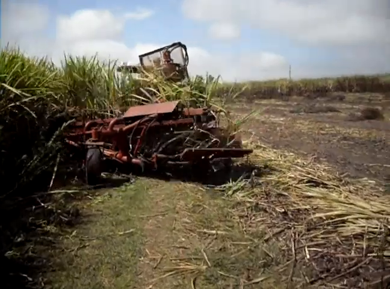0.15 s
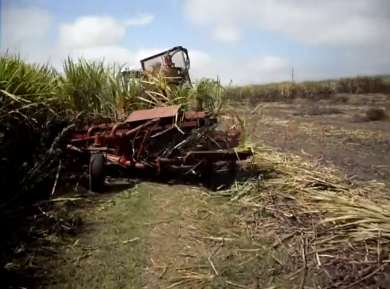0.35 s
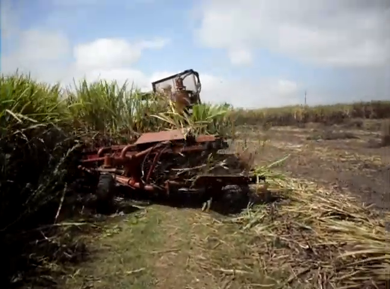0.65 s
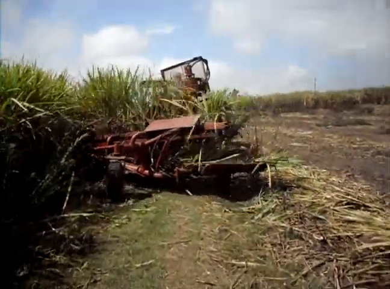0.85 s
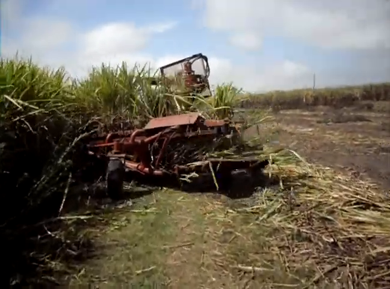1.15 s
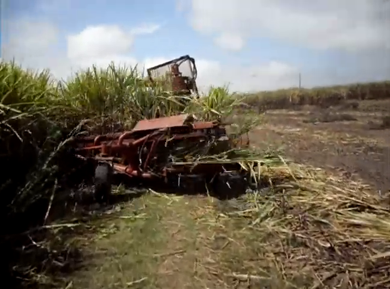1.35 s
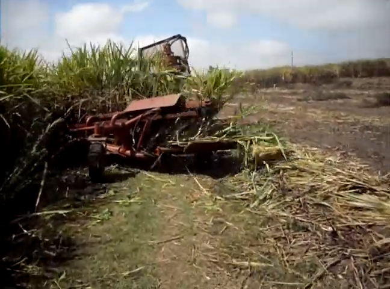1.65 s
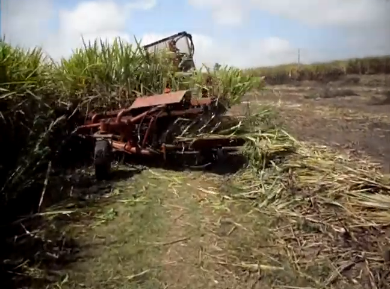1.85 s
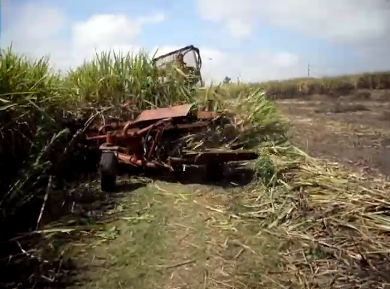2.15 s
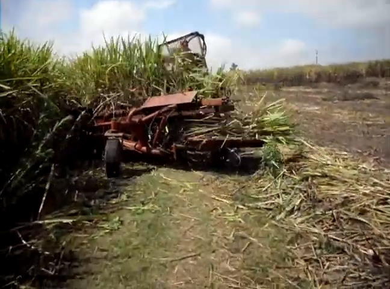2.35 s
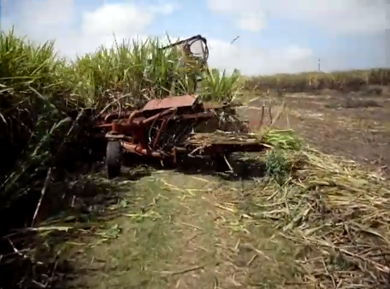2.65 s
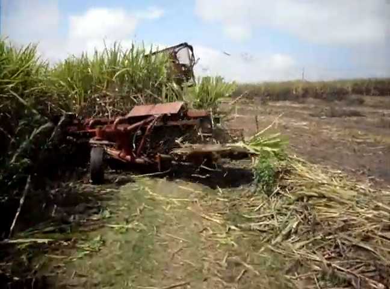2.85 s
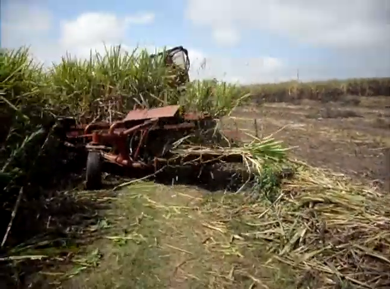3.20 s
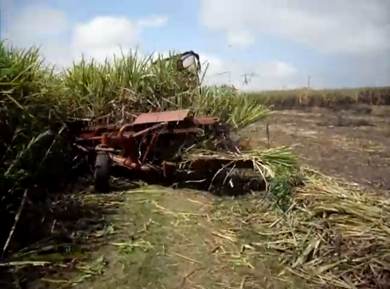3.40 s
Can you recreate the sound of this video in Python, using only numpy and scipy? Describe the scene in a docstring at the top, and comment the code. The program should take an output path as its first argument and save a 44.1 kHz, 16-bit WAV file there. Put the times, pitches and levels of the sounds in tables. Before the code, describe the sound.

A cane harvester's spinning cutter whines and rasps in uneven surges over rumble and leafy hiss.

```python
"""Cane harvester at work

A tractor diesel drones as wavering low tones, most at shaft harmonics, over a rumble of filtered noise.
A spinning cutter hums, howls and whines in tones that follow its blade rate; noise pulsed by each blade
rasps through housing resonances and crushes cane, surging with the bites as the speed drifts.
Leaves thrash as filtered hiss with random snaps, and a stalk knocks twice as decaying, resonant noise.
The whole sound is narrow-band, with rounded peaks of which the highest clip.
"""
import sys
import numpy as np
from scipy import signal
from scipy.fft import rfft, irfft, next_fast_len
from scipy.io import wavfile

SR = 44100
rng = np.random.default_rng(int(sys.argv[2]) if len(sys.argv) > 2 else 0)


def store_pcm(level_fs):
    """Save levels as 16-bit WAV."""
    pcm = np.round(np.clip(level_fs, -1, 1) * 32767).astype(np.int16)
    wavfile.write(sys.argv[1], SR, np.atleast_2d(pcm).T)


N = 155673  # samples

# Low engine tones: (multiple of the shaft rate [1], level [dB])
ENGINE_TONES = [(2.07, -47), (3, -47), (6, -40.5), (8, -39), (9, -39.5), (14, -37.5)]
ENGINE_WAVER = 0.7  # random share against the steady tone
# Exhaust and running-gear noise: (frequency [Hz], relative spectral density [dB])
RUMBLE_SPECTRUM = [(20, -19), (60, -19), (110, -10), (160, -3.5), (200, -1), (270, -5.5), (305, -9.5),
                   (370, -12), (440, -5), (580, -4), (780, -10), (1100, -7), (2000, -14), (5000, -25)]
RUMBLE_DB, FIRING_DEPTH = -22.5, 0.042
RUMBLE_FOLLOWS = 0.069  # dB of rumble per dB of bite

# Leaves passing through the machine: (time [s], level before LEAVES_DB [dB])
LEAF_FEED = [(0, -25), (.33, -25.5), (.85, -23.5), (1.25, -24), (1.35, -25.5), (1.5, -23), (2.1, -23.5),
             (2.3, -21.5), (2.5, -22), (2.6, -23.7), (2.85, -26), (3.05, -20.5), (3.16, -23), (3.42, -20.5),
             (3.53, -23)]
# Leaf noise: (frequency [Hz], relative spectral density [dB])
LEAF_SPECTRUM = [(400, -27.5), (1000, -4.5), (1500, -2.5), (2250, -4), (2800, 0.1), (3400, 1.3),
                 (4100, -0.4), (5000, -1.04), (6300, -2), (8000, -21)]
LEAVES_DB = 4
SNAPS_PER_S, SNAP_SPREAD_DB = 900, 4  # mean rate; scale of the random sizes
SNAP_DB = -6.5  # snaps against the hiss, before colouring

# Stalk knocks on the frame: (time [s], level before attack and decay [dB])
KNOCKS = [(2.8163, -10.5), (2.8263, -14)]
# Resonances of the stalk: (frequency [Hz], width [Hz], relative gain [dB])
STALK_RESONANCES = [(2220, 470, -8), (2806, 220, 1.5), (3500, 300, -3)]
KNOCK_ATTACK_S, KNOCK_DECAY_S = 0.0012, 0.007  # time constants

# Cutter speed as blade passes: (time [s], rate [Hz])
BLADE_RATE = [(0, 141.9), (.65, 142.7), (.9, 142.3), (1.1, 140.6), (1.4, 140.5), (1.6, 140.8), (1.8, 140.4),
              (2.03, 139.7), (2.45, 138.1), (2.85, 138.3), (3.3, 141.8), (3.53, 144.1)]
PASSES_PER_TURN = 6
# Load on the cutter: (time [s], level [dB])
BITE_LEVEL = [(0, -26), (.35, -37), (.48, -25.5), (.64, -24.5), (.69, -20.5), (.77, -21.5), (.88, -17),
              (1.02, -22.5), (1.14, -20.5), (1.23, -17), (1.37, -29.5), (1.5, -21.5), (1.635, -16),
              (1.69, -22), (1.85, -22.5), (1.89, -16), (1.95, -18.5), (2.025, -11), (2.12, -25),
              (2.17, -17.5), (2.24, -26.5), (2.275, -13.5), (2.31, -15), (2.335, -19), (2.42, -24),
              (2.5, -22), (2.59, -30.5), (3.14, -26), (3.22, -17.5), (3.27, -15), (3.36, -20.5),
              (3.42, -18), (3.53, -22.5)]
# Low howl of the cutter: (time [s], level [dB])
HOWL_LEVEL = [(0, -46), (.38, -34), (.47, -31), (.82, -26), (.895, -17.5), (.98, -29.5), (1.08, -21),
              (1.17, -24.5), (1.25, -21.5), (1.38, -35), (1.62, -22), (1.69, -26), (1.77, -27), (1.9, -31),
              (2.03, -33), (2.45, -38), (3.15, -39.5), (3.3, -26.5), (3.53, -26)]
# Hum of the blades: (time [s], level [dB])
HUM_LEVEL = [(0, -42), (.22, -32.5), (.45, -54), (.68, -47), (.82, -29.5), (1.15, -41.5), (1.4, -34),
             (1.9, -33), (2.1, -40), (3.05, -43.5), (3.35, -28), (3.53, -30)]
# Partials of hum, howl and higher whine: (multiple of the blade rate [1], relative level [dB])
HUM_PARTIALS = [(3, 0.5), (6, -3.5)]
HOWL_PARTIALS = [(7, -7), (8, -0.5)]
WHINE_PARTIALS = [(6, -21.5), (9, -6.5), (10, -8.5), (11, -14), (12, -11.5), (12.93, -10.5), (13.42, -10.5),
                  (15, -8), (18, -11.5), (19, -16)]
HOWL_WAVER, WHINE_WAVER = 0.51, 1.0  # random share against the steady tone
WAVER_HZ = 9.5
# Resonances of cutter and housing: (frequency [Hz], width [Hz], relative gain [dB])
HOUSING_RESONANCES = [(1184, 71, 3), (1281, 96, 1.5), (1478, 120, -2.5), (1692, 90, 2.5), (1824, 160, -3),
                      (2003, 100, -1.5), (2462, 270, -10.5)]
# Cane fibres tearing: (frequency [Hz], relative spectral density [dB])
CRUSH_SPECTRUM = [(400, -15), (900, -9), (1500, -6), (2300, 0), (2900, 3.5), (3600, -3), (5000, -13),
                  (8000, -21.5)]
WHINE_DB, RASP_DB, CRUSH_DB = -2, -4, -5  # against the bite level
BLADE_DEPTH, CRUSH_DEPTH = 0.89, 0.35  # strength of the swell at each blade pass

# Band limit of the whole sound: (frequency [Hz], gain [dB])
BAND_LIMIT = [(4000, 1), (5100, 1), (5350, -10), (5600, -15), (5900, -17.5), (6150, -30), (6400, -60.5),
              (6800, -100)]
KNEE, OVERLOAD = 0.74, 0.73  # rounding and clipping heights, share of full scale
CUTOFF_HZ = 15800  # the stopband starts here


def from_db(db):
    """Logarithmic level: 20 dB is a factor of ten in amplitude."""
    return 10 ** (np.asarray(db) / 20)


def rms_one(x):
    """Normalisation: division by the root mean square gives unit power."""
    return x / np.sqrt(np.mean(x ** 2) + 1e-20)


def in_time(rows):
    """Linear interpolation: straight lines join the (time, value) rows."""
    return np.interp(np.arange(N) / SR, *np.transpose(rows))


def coloured(x, spectrum):
    """Linear filtering: each frequency is scaled by a curve drawn over log frequency."""
    size = next_fast_len(N + 8192)  # padding limits wrap-around
    hz, db = np.transpose(spectrum)
    bins = np.maximum(np.arange(size // 2 + 1) * SR / size, 1)
    gain = from_db(np.interp(np.log(bins), np.log(hz), db))
    return irfft(rfft(x, size) * gain, size)[:N]


def drift(rate_hz):
    """Low-pass noise: two equal poles leave a slow random motion of about unit spread."""
    step = 40  # samples between the slow values
    r = np.exp(-2 * np.pi * rate_hz * step / SR)
    noise = rng.standard_normal(N // step + 2002)
    slow = signal.lfilter([1], [1, -2 * r, r * r], noise)[2000:]  # drop the filter's onset
    return np.interp(np.arange(N) / step, np.arange(len(slow)), rms_one(slow))


def resonate(x, resonances):
    """Modal superposition: parallel two-pole resonators add with alternating sign."""
    out = 0
    for k, (hz, width, db) in enumerate(resonances):
        r = np.exp(-np.pi * width / SR)
        poles = [1, -2 * r * np.cos(2 * np.pi * hz / SR), r * r]
        ring = (1 - r * r) / 2 * signal.lfilter([1, 0, -1], poles, x)
        out = out + (-1) ** k * from_db(db) * ring
    return out


def partials(turns, table, waver, rate_hz):
    """Additive synthesis: sinusoids follow a rotation's speed, each wavering in strength and phase."""
    out = 0
    for multiple, db in table:
        wander = (drift(rate_hz) + 1j * drift(rate_hz)) / np.sqrt(2)
        swing = (1 + waver * wander) / np.sqrt(1 + waver ** 2)
        tone = np.exp(2j * np.pi * (multiple * turns + rng.random()))
        out = out + np.sqrt(2) * from_db(db) * np.real(swing * tone)
    return out


def puffs(turns, depth):
    """Amplitude modulation: white noise swells once a cycle."""
    return rng.standard_normal(N) * np.exp(depth * np.cos(2 * np.pi * turns))


def tractor(turns, bite_db):
    """Superposition: tones that follow the shaft speed, over noise pulsed by firing and raised by load."""
    firings = turns * PASSES_PER_TURN / 2  # three a turn
    rumble = rms_one(coloured(puffs(firings, FIRING_DEPTH), RUMBLE_SPECTRUM))
    rumble_db = RUMBLE_DB + RUMBLE_FOLLOWS * (bite_db - bite_db.mean())
    tones = partials(turns, ENGINE_TONES, ENGINE_WAVER, rate_hz=2.7)
    return tones + rumble * from_db(rumble_db)


def leaves():
    """Random impulses: snaps of uneven size and sign join a hiss under one spectral envelope."""
    sizes = from_db(SNAP_SPREAD_DB * np.minimum(rng.exponential(1, N), 4))
    signed_sizes = sizes * rng.choice([-1, 1], N)
    snaps = rms_one(signed_sizes * (rng.random(N) < SNAPS_PER_S / SR))
    rustle = rng.standard_normal(N) + from_db(SNAP_DB) * snaps
    return from_db(in_time(LEAF_FEED) + LEAVES_DB) * rms_one(coloured(rustle, LEAF_SPECTRUM))


def knocks():
    """Transient decay: brief exponential envelopes shape noise coloured by the stalk's resonances."""
    envelope = 0
    for start_s, db in KNOCKS:
        age = np.maximum(np.arange(N) / SR - start_s, 0)
        attack = 1 - np.exp(-age / KNOCK_ATTACK_S)
        envelope = envelope + from_db(db) * attack * np.exp(-age / KNOCK_DECAY_S)
    return envelope * rms_one(resonate(rng.standard_normal(N), STALK_RESONANCES))


def cutter(passes, bite_db):
    """Blade-pass radiation: tones that follow the blade rate join noise modulated by each pass."""
    hum = from_db(in_time(HUM_LEVEL)) * partials(passes, HUM_PARTIALS, HOWL_WAVER, WAVER_HZ)
    howl = from_db(in_time(HOWL_LEVEL)) * partials(passes, HOWL_PARTIALS, HOWL_WAVER, WAVER_HZ)
    whine = from_db(WHINE_DB) * partials(passes, WHINE_PARTIALS, WHINE_WAVER, WAVER_HZ)
    rasp = from_db(RASP_DB) * rms_one(resonate(puffs(passes, BLADE_DEPTH), HOUSING_RESONANCES))
    crush = from_db(CRUSH_DB) * rms_one(coloured(puffs(passes, CRUSH_DEPTH), CRUSH_SPECTRUM))
    return hum + howl + from_db(bite_db) * (whine + rasp + crush)


def scene():
    """Superposition: tractor and cutter share one rotation; leaves and knocks add to them."""
    passes = np.cumsum(in_time(BLADE_RATE)) / SR
    bite_db = in_time(BITE_LEVEL)
    machine = tractor(passes / PASSES_PER_TURN, bite_db) + cutter(passes, bite_db)
    return (machine + leaves() + knocks())[None]


def record(dry):
    """Saturation and band limiting: peaks round off, the treble is lost, the highest peaks clip."""
    rounded = dry[0] / (1 + (dry[0] / KNEE) ** 6) ** (1 / 6)
    heard = np.clip(coloured(rounded, BAND_LIMIT), -OVERLOAD, OVERLOAD)
    low_pass = signal.cheby2(12, 70, CUTOFF_HZ, fs=SR, output="sos")
    return signal.sosfilt(low_pass, heard)[None]


dry = scene()
out = record(dry)
store_pcm(out)
```